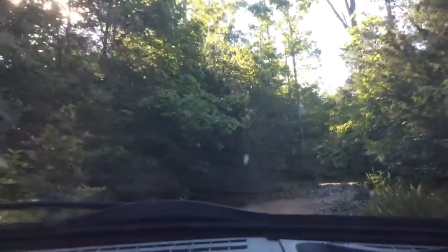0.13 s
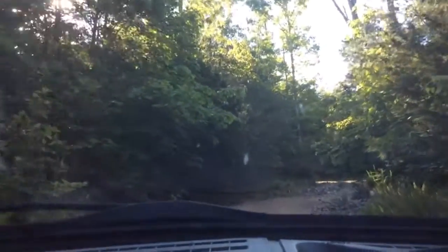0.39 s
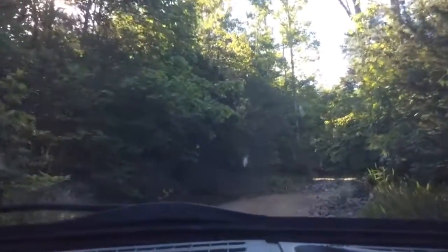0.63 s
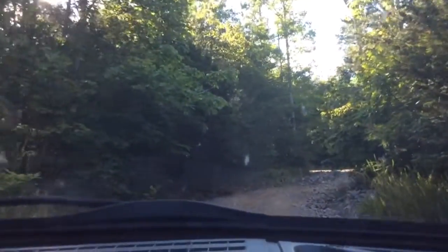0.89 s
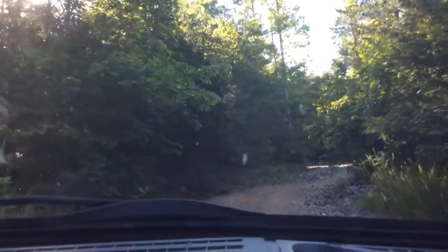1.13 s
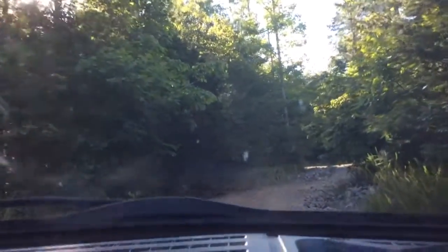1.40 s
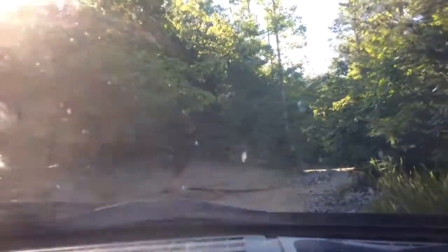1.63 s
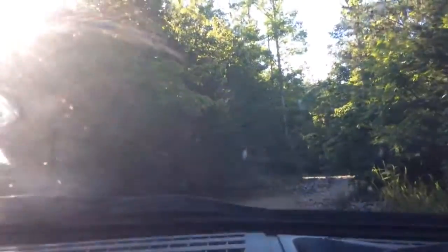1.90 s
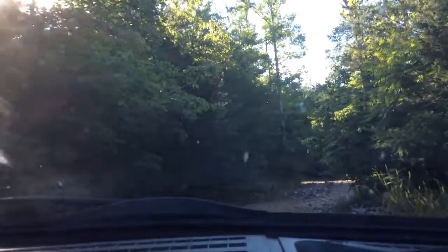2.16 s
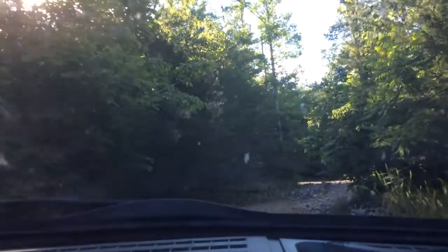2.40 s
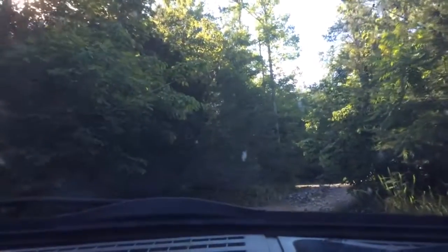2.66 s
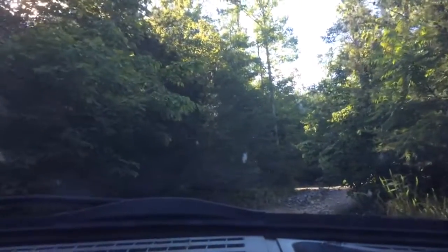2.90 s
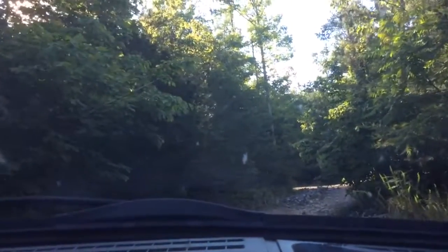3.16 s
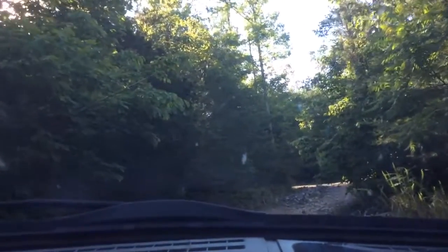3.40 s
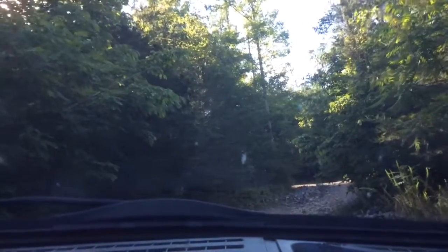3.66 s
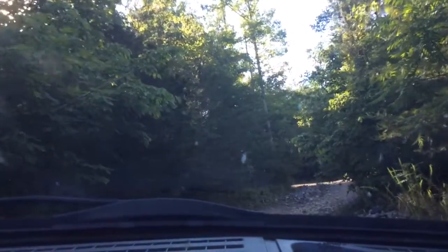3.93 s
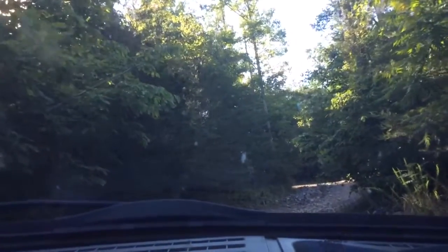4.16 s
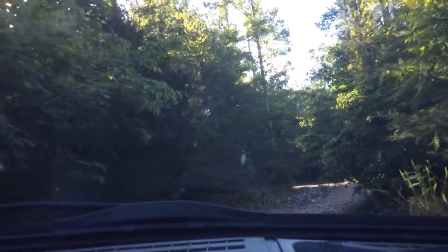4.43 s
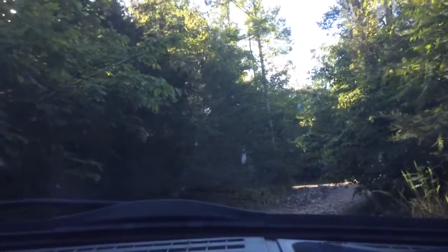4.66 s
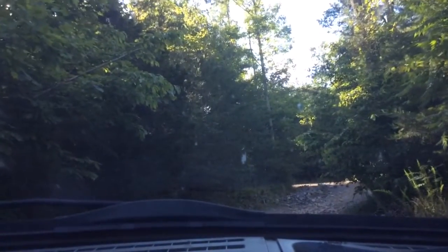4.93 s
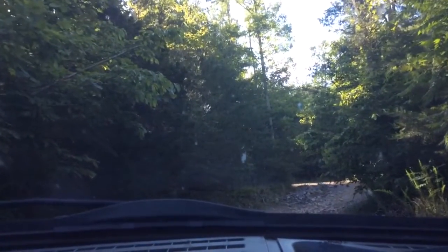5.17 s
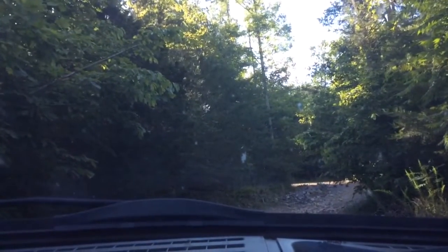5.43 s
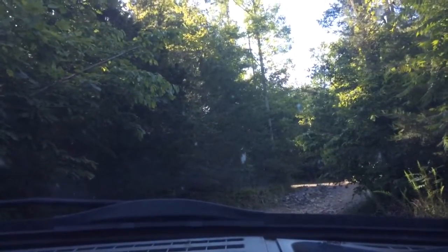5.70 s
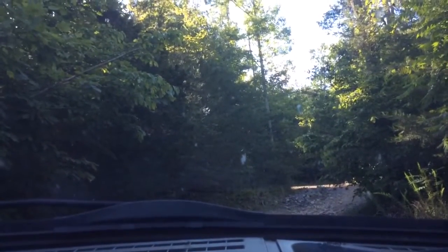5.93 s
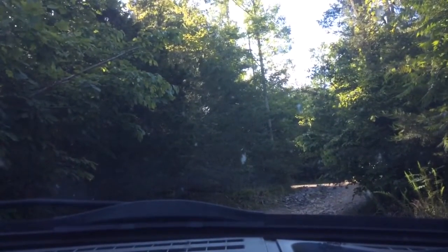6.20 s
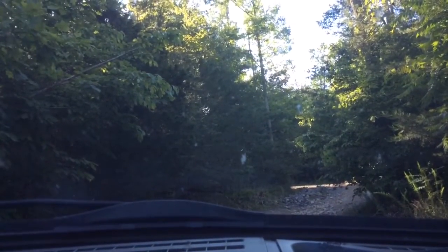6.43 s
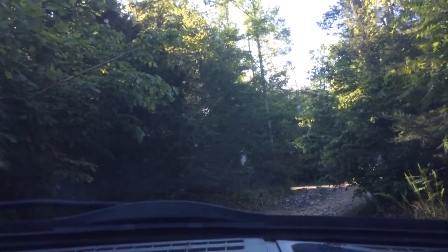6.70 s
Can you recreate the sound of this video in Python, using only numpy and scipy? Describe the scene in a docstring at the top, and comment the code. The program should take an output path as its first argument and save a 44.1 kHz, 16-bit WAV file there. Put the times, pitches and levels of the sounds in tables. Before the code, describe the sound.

Low booming truck engine rumble fills the cab, dipping in pitch mid-way and rising at the end, over dull road roar and light rattles.

```python
"""Uphill in a V8 pickup, inside the cab

One microphone on the dashboard, in the cab with the engine lugging at low revs, later picking up speed.
Firing orders, cosines locked to the four-stroke cycle, boom in the cabin over a dull noise roar of
engine, fan and tyres on dirt. Loose trim, tapped into ringing at the fifth order, buzzes with the boom.
A few ticks and dull knocks set off short ringing modes, and two short high hisses of noise pass.
"""
import sys
import numpy as np
from scipy import signal
from scipy.io import wavfile
from scipy.ndimage import uniform_filter1d

SR = 44100
rng = np.random.default_rng(int(sys.argv[2]) if len(sys.argv) > 2 else 0)


def transcribe(u):
    """Save the signal u as a 16-bit wav file named by the first command-line argument.

    u: samples, shape (n,) or (channels, n), limited to [-1, 1]; the rate is SR.
    q: integer samples, one column per channel.
    """
    v = np.clip(np.atleast_2d(u).T, -1, 1)
    q = np.round(v * 32767).astype(np.int16)
    wavfile.write(sys.argv[1], SR, q)


def level_to_linear(level):
    """Convert decibel levels to linear amplitude factors, elementwise."""
    exponent = np.asarray(level, float) / 20
    return 10 ** exponent


N = 300762

# engine speed over time: time_s, speed (four-stroke cycles per s)
ENGINE_SPEED = [(0.0, 11.932), (0.52, 11.418), (1.1, 11.286), (1.42, 11.386), (1.8, 11.299), (1.9, 11.08),
                (2.04, 10.638), (2.32, 10.963), (2.5, 10.927), (2.85, 10.902), (3.43, 10.214),
                (3.79, 10.61), (3.89, 10.692), (5.07, 11.229), (5.21, 11.177), (5.69, 11.609),
                (6.15, 12.117), (6.25, 12.251), (6.55, 13.543), (6.82, 14.163)]
# what follows the engine speed: speed (cycles per s), roar_swell_db, trim_tap_db (peak, before unevenness)
SPEED_EFFECTS = [(10.6, .5, -69), (11.3, 0, -70), (11.8, 0, -62), (12.2, .5, -60), (12.5, 1.5, -62),
                 (12.7, 2.5, -55), (13.65, 2.5, -55), (13.78, 2, -65)]
# roar of engine, fan and tyres on dirt, before cab and swell: frequency_hz, density (dB per Hz)
ROAR_SPECTRUM = [(15, -59.5), (35, -70), (60, -66.5), (110, -67), (160, -70.5), (300, -80), (500, -85),
                 (700, -90.5), (1280, -96.5), (1520, -102), (2600, -107), (4500, -114), (7200, -120),
                 (8200, -116), (11000, -120), (15200, -128)]
# panels and air of the cab colouring the roar: frequency_hz, width_hz, gain_db
CAB_RESONANCES = [(305, 4, 5.5), (356, 18, 1), (410, 11, 0.5), (514, 9.1, 5), (613, 22, 1), (866, 73, 5.5),
                  (940, 50, -4), (1044, 22, 6.5), (1140, 56, 1), (1275, 67, 4.5), (1500, 220, 2.5),
                  (1860, 200, 3.5), (2070, 60, 1), (2400, 270, 3), (3830, 170, 2), (8300, 170, 4)]
# short hisses: start_s, stop_s, tail_s, level_db (before the swell and drop)
HISS_EVENTS = [(0.565, 0.932, 0.27, -62.5), (3.56, 3.703, .13, -77.5)]
# relative colour of the hisses: frequency_hz, density (dB per Hz)
HISS_SPECTRUM = [(2350, -40), (4000, -10), (4450, -12), (5410, -10), (6140, -12), (7770, -6), (8400, -2),
                 (9330, 0), (13000, -5), (14300, -2), (15200, -5)]
# single ticks: time_s, tick_db (peak), knock_db (peak of the dull knock under it)
TICK_EVENTS = [(0.414, -51.5, -55), (0.4593, -70, -53.5), (0.4997, -55, -67), (0.5510, -58, -68),
               (1.2503, -58, -54), (1.3789, -58, -50), (1.4910, -55.5, -56), (1.5362, -51, -45.5),
               (1.6783, -51.5, -63.5), (1.7794, -68, -47), (3.6282, -63.5, -46.5), (6.4291, -59.5, -45),
               (6.4897, -58.5, -61)]
# ringing of the dashboard under a knock: frequency_hz, width_hz, relative_db
DASHBOARD_MODES = [(1100, 190, 3.5), (2000, 300, -8), (3500, 500, -9.5), (5500, 800, -16.5)]
# ringing of the loose trim: frequency_hz, width_hz, relative_db
TRIM_MODES = [(6000, 2000, -9), (8300, 300, -9), (9000, 1500, -1), (10400, 350, -6), (11500, 1800, 0),
              (14000, 2000, -5)]
# firing slots, out of eight, that leave by the left pipe
LEFT_PIPE_SLOTS = [0, 3, 5, 6]
# low firing orders: order (per cycle), level_db (at the middle speed, before the cabin boom),
# slope (dB per cycle/s), bend (dB per (cycle/s) squared)
LOW_ORDERS = [(4, -55.9, 1.0, 2.5), (5, -20.5, 1.2, 0.2), (6, -33.0, 5.3, -3.2), (7, -32.8, -1.9, 1.5),
              (8, -19.5, -0.7, -2.3), (9, -45.5, -7.2, 1.2), (10, -51.3, -2.0, 0.7), (11, -53.8, -2.4, 1.2),
              (12, -62.0, -1.9, 0.4), (13, -46.6, 7.8, -3.0), (14, -57.2, -0.2, 0.0), (15, -59.2, 2.2, 0.0),
              (16, -56, -2.5, 2.5), (17, -57.1, -1.8, 0.0), (18, -58.2, 0.0, 0.0), (19, -57.0, -0.5, 0.0),
              (20, -58.6, 0.1, 0.0), (21, -58, 0.6, 1), (22, -59.8, -2.9, 0.0), (23, -61.7, 1.0, 0.0),
              (24, -58.9, 0.1, 0.0), (25, -68.0, -0.4, 0.0), (26, -61.5, -0.6, 0.0), (27, -65.0, -0.4, 0.0),
              (28, -63.1, -0.6, 0.0), (29, -63.8, -0.1, 0.0)]
# how the cabin passes the low orders: frequency_hz, gain_db
CABIN_BOOM = [(50, -1.5), (58, -0.3), (66, 0.47), (74, -1), (82, -2), (90, 0.54), (98, -2), (110, 2.5),
              (130, 10.5), (155, 4), (175, 3.5), (200, -5), (230, -1), (265, -7.5), (295, 4), (320, -4.5),
              (400, 1.2)]
# higher orders through pipe and panels: frequency_hz, level_db (of one order, before wavering)
PIPE_LEVELS = [(300, -68.5), (340, -70.5), (420, -71.5), (520, -75), (700, -91)]
# air modes that delay what lies above them; a null turns it forward:
# frequency_hz, half_width_hz, phase_swing (half cycles)
CAB_AIR_MODES = [(65.4, 14, -1.57), (89.5, 10.8, 3), (92, 3, -1.19)]
# steady fuzzy hums that ignore the revs: pitch_hz, level_db (peak, before wavering), waverings (per s)
STEADY_HUMS = [(215.5, -57.5, 2), (305, -59, 3)]


def read(points, hz):
    """A spectrum read on a log-frequency axis."""
    f, value = np.transpose(points)
    return np.interp(np.log(hz + 1), np.log(f + 1), value)


def curve(rows):
    """Every column of a table of times at every sample."""
    s, *columns = np.transpose(rows)
    return [np.interp(np.arange(N) / SR, s, c) for c in columns]


def by_speed(speed, axis):
    """One column of SPEED_EFFECTS at the present revs."""
    speeds, values = np.transpose(SPEED_EFFECTS)[[0, axis]]
    return np.interp(speed, speeds, values)


def evened(x):
    """Scales to rms 1."""
    return x / np.sqrt(np.mean(x ** 2) + 1e-20)


def wander(per_s):
    """Slow random drift: straight lines between Gaussian knots of unit spread."""
    knots = rng.standard_normal(200)
    return np.interp(np.arange(N) / SR * per_s, np.arange(200), knots)


def noise(colour, patchy_db, peaks=()):
    """Noise from random short-time spectra with drifting patches; colour is dB per Hz."""
    frames, hz = N // 512 + 5, np.fft.rfftfreq(2048, 1 / SR)
    real, imaginary, patches = rng.standard_normal((frames, 1025, 3)).T
    patches = uniform_filter1d(patches, size=20, axis=0)  # across frequency
    patches = evened(uniform_filter1d(patches, size=3, axis=1))  # along time
    peaks_db = sum(db / (1 + (2 * (hz - f) / width) ** 2) for f, width, db in peaks)
    gain = level_to_linear(read(colour, hz) + peaks_db)
    spectra = (real + 1j * imaginary) * gain[:, None] * level_to_linear(patchy_db * patches)
    out = signal.istft(spectra, nperseg=2048, noverlap=1536)[1][:N]
    return evened(out) * np.sqrt(np.sum(gain ** 2) * SR / 2048)


def ring(clicks, modes):
    """Clicks set off short decaying modes, together scaled to peak 1."""
    t = np.arange(1500) / SR
    shape = sum(level_to_linear(db) * np.exp(-np.pi * width * t) * np.sin(2 * np.pi * hz * t)
                for hz, width, db in modes)
    return signal.oaconvolve(clicks, shape / abs(shape).max())[:N]


def roar(speed):
    """Broad noise coloured by the cab's resonances, its level following the revs and drifting."""
    swell_db = by_speed(speed, axis=1) + 0.52 * wander(1.5)
    return noise(ROAR_SPECTRUM, patchy_db=1.3, peaks=CAB_RESONANCES) * level_to_linear(swell_db)


def hiss():
    """Short bursts of high noise that rise, swell up to a peak, drop and die away."""
    rise_s, edge_s = 0.074, 0.032
    start_db, swell_db, drop_db, tail_db = -17.5, 3.5, -8, -7
    gain = 0
    for start, stop, tail, db in HISS_EVENTS:
        low_db = db + drop_db
        envelope_db, = curve([
            (start - edge_s, -110),
            (start, db + start_db),
            (start + rise_s, db),
            (stop - rise_s * 2.0, db),
            (stop, db + swell_db),
            (stop + edge_s, low_db + swell_db),
            (stop + tail, low_db + tail_db),
            (stop + tail + rise_s, -110)])
        gain = gain + level_to_linear(envelope_db)
    return gain * evened(noise(HISS_SPECTRUM, patchy_db=1.5))


def knocks():
    """Dull knocks under the ticks ring the dashboard's broad modes."""
    clicks = np.zeros(N)
    for s, _, knock_db in TICK_EVENTS:
        clicks[round(s * SR)] += level_to_linear(knock_db)
    return ring(clicks, DASHBOARD_MODES)


def rebounds(taps):
    """A short rattle of random small hits follows each tap and decays as the part settles."""
    rate_per_s, settle_s, level_db = 3000, 0.003, -5
    rattle = signal.lfilter([1], [1, -np.exp(-1 / (settle_s * SR))], taps)
    rattle *= rng.standard_normal(N) * (rng.random(N) < rate_per_s / SR)
    return level_to_linear(level_db) * rattle


def trim(speed, turns):
    """Fifth-order taps of uneven strength ring the loose trim; ticks and grit strike the same part."""
    lag_speed, lag = 12.7, 0.3  # above this many cycles per s the taps fall behind, in beats per cycle/s
    grit_per_s = 40  # stray small ticks
    beats = 5 * turns - lag * np.maximum(speed - lag_speed, 0)
    new_beat = np.diff(np.floor(beats), prepend=np.inf) > 0
    uneven_db = 1.5 * wander(2.5) + 2.8 * rng.standard_normal(N)
    taps = new_beat * level_to_linear(by_speed(speed, axis=2) + uneven_db)
    grit_db = -71.5 + 4.9 * np.minimum(rng.exponential(1, N), 3)
    taps += level_to_linear(grit_db) * (rng.random(N) < grit_per_s / SR)
    for s, tick_db, _ in TICK_EVENTS:
        taps[round(s * SR)] += level_to_linear(tick_db)
    return ring(taps + rebounds(taps), TRIM_MODES)


def hums():
    """Steady tones blurred by random drift of level and phase."""
    t = np.arange(N) / SR
    return sum(level_to_linear(db + 2.7 * wander(per_s)) * np.cos(2 * np.pi * hz * t + 1.4 * wander(per_s))
               for hz, db, per_s in STEADY_HUMS)


def order(k, turns, speed, level_db):
    """One firing order (rms dB); one bank's uneven firing and the cab's air set its timing in the cycle."""
    cab_lead = 2.23  # radians
    stroke = np.exp(-2j * np.pi * k / 8)
    bank = sum(stroke ** slot for slot in LEFT_PIPE_SLOTS)
    lead = np.angle(bank + 0.01 * stroke)  # one cylinder a little strong
    air = sum(swing * np.arctan((k * speed - hz) / width) for hz, width, swing in CAB_AIR_MODES)
    return -np.sqrt(2) * level_to_linear(level_db) * np.cos(2 * np.pi * k * turns + lead + cab_lead + air)


def low_orders(speed, turns):
    """Orders below 30 boom through the cabin; from the ninth up they are increasingly unsteady."""
    middle_speed = 11.5  # cycles per s
    off = speed - middle_speed
    boom = 0
    for k, db, slope, bend in LOW_ORDERS:
        # combustion differs from cycle to cycle
        uneven_db = min(0.036 * max(k - 8, 0), 2.5) * wander(5.4)
        level_db = db + slope * off + bend * off ** 2 + read(CABIN_BOOM, k * speed)
        scatter = (k > 17) * rng.random()  # random timing above the 17th order, in cycles
        boom = boom + order(k, turns + scatter, speed, level_db + uneven_db)
    return boom


def upper_orders(speed, turns):
    """Weak orders 30 to 59 through pipe and panels, scattered in timing and wavering in level."""
    total = 0
    for k in range(30, 60):
        level_db = read(PIPE_LEVELS, k * speed) + 3.0 * wander(1.5)
        total = total + order(k, turns + rng.random(), speed, level_db)
    return total


def engine(speed, turns):
    """Low and upper firing orders, all locked to the crank."""
    return low_orders(speed, turns) + upper_orders(speed, turns)


def scene():
    """Everything at the one microphone on the dashboard."""
    start_turn = 0.549  # crank position at the outset, in cycles
    speed, = curve(ENGINE_SPEED)
    turns = start_turn + np.cumsum(speed) / SR
    background = roar(speed) + hiss() + hums()
    cab_parts = knocks() + trim(speed, turns)
    return (background + cab_parts + engine(speed, turns))[None]


def band_limit(x):
    """A steep low-pass at the top of the band."""
    return signal.sosfilt(signal.butter(12, 15310, fs=SR, output="sos"), x)


def record(dry):
    """The sound opens over a few milliseconds."""
    opening_s = 0.008
    rise = np.minimum(np.arange(N) / (opening_s * SR) + 0.1, 1)  # starts a tenth of the way up
    mix = dry * np.sin(np.pi / 2 * rise) ** 2
    return band_limit(mix)


dry = scene()
out = record(dry)
transcribe(out)
```